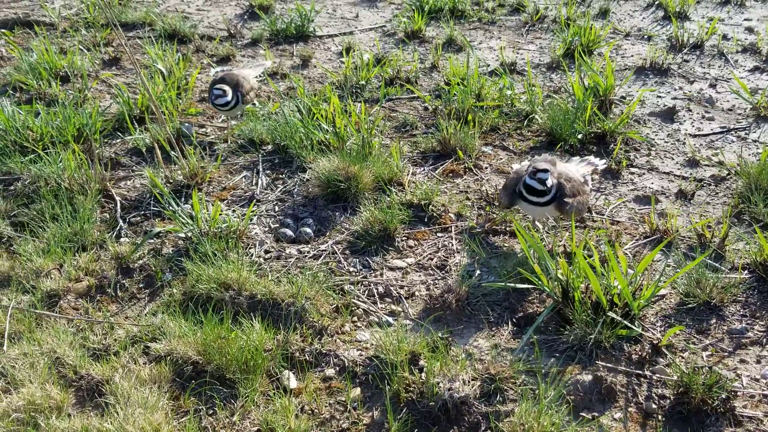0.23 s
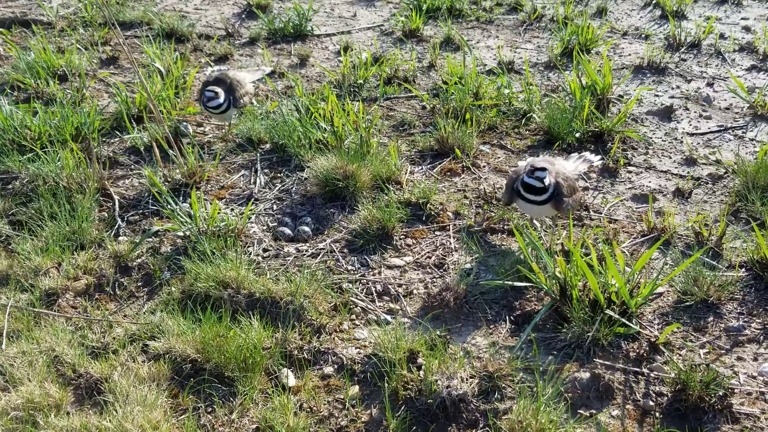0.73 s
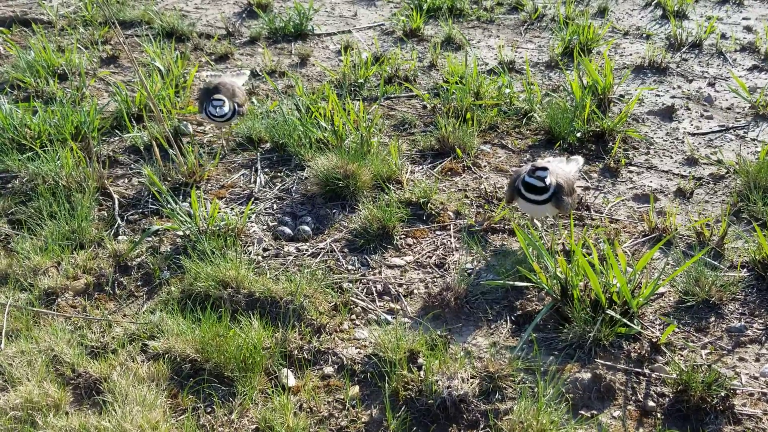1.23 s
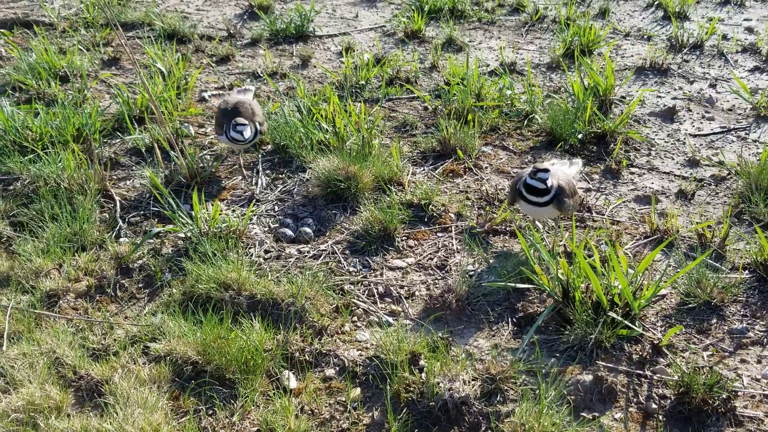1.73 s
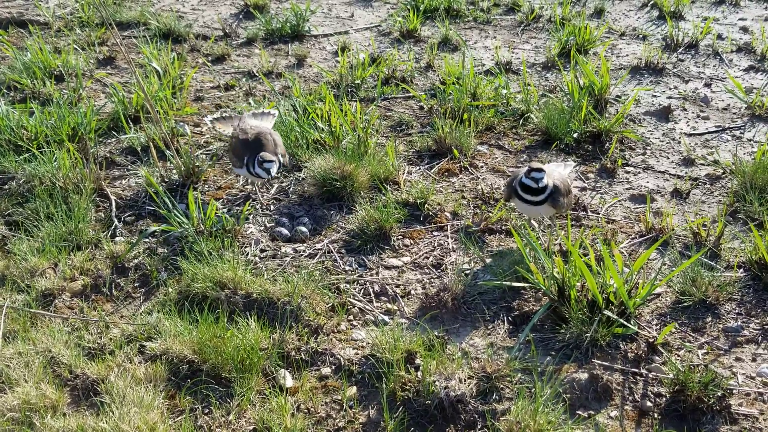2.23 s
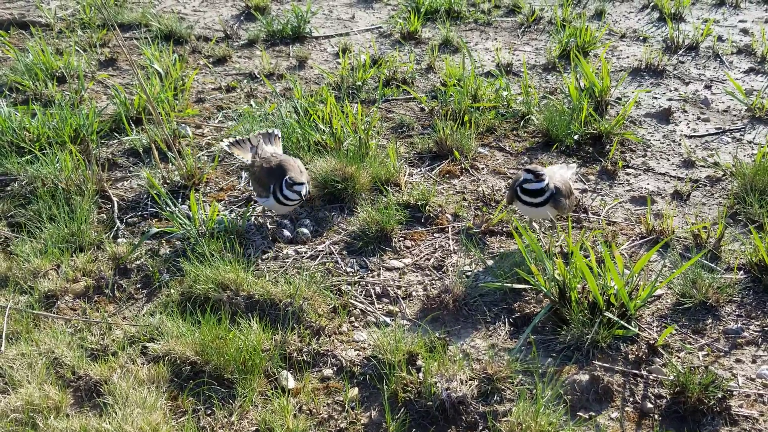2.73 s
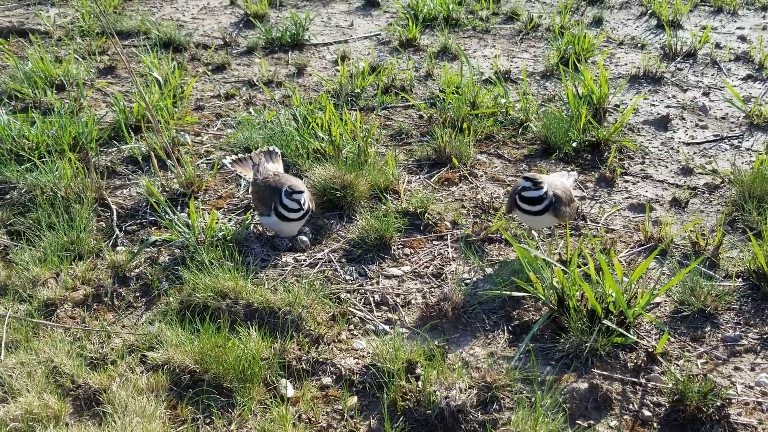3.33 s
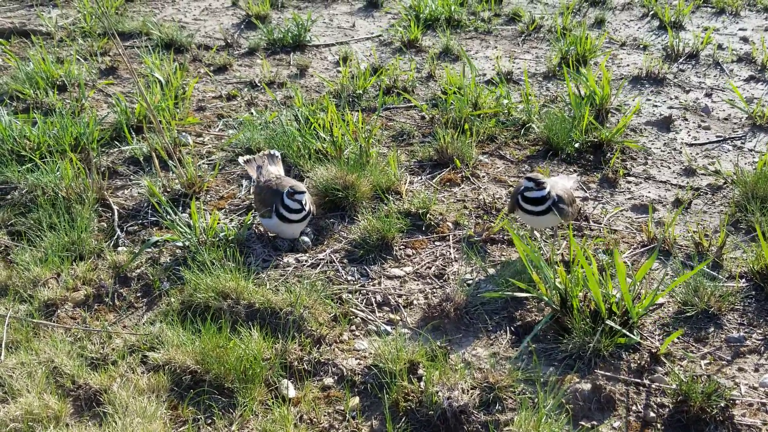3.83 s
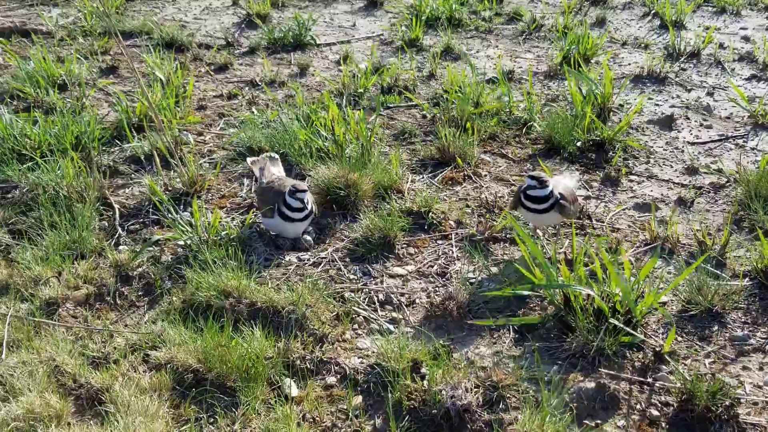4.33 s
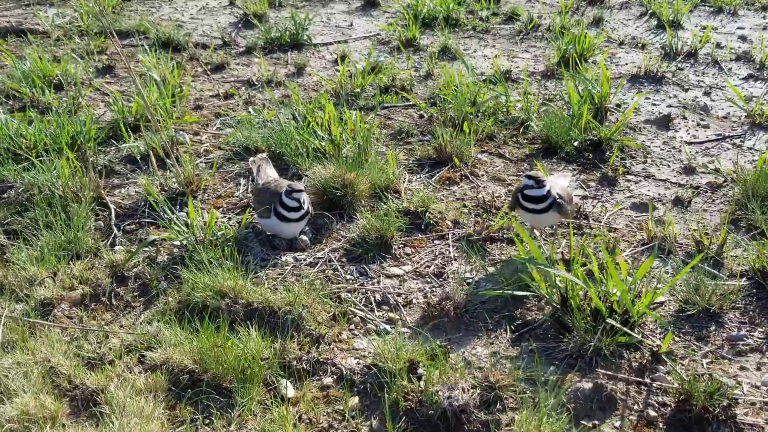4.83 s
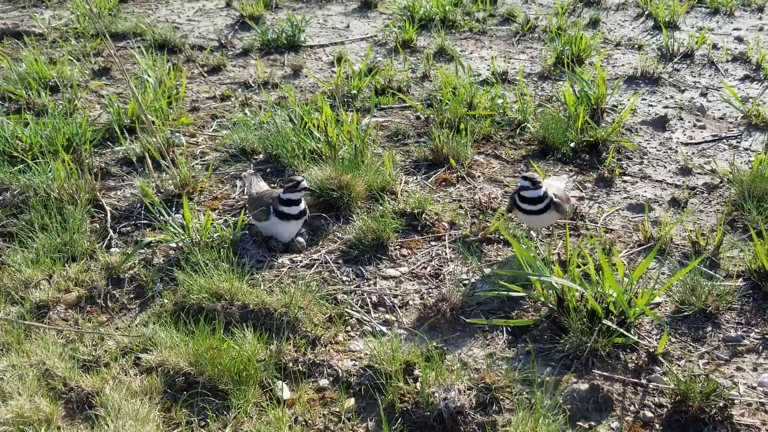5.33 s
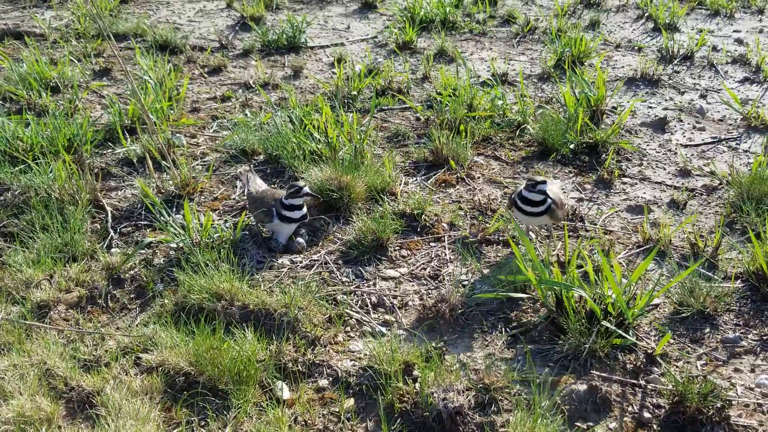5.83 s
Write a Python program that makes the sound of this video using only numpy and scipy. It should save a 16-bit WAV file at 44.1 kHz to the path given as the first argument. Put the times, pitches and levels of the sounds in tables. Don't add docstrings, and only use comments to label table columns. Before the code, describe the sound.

In an open grassy field, two killdeer-like shorebirds near a ground nest give loud, piercing alarm peeps, overlapping at first, then one bird note after note. After a brief pause comes a hissy breath and a long dipping whistle. Wind then strikes the microphone in bassy thumps and pops, with isolated calls and finally soft wavering calls and a short trill. Faint insects and rustling leaves lie beneath.

```python
import sys
import numpy as np
from scipy import signal
from scipy.fft import rfft, irfft, next_fast_len
from scipy.io import wavfile
from scipy.ndimage import uniform_filter1d, map_coordinates

SR = 44100
rng = np.random.default_rng(int(sys.argv[2]) if len(sys.argv) > 2 else 0)


def store_wav(level_fs):
    pcm = np.round(np.clip(np.atleast_2d(level_fs), -1, 1) * 32767)
    wavfile.write(sys.argv[1], SR, pcm.T.astype(np.int16))


def decibels_to_gain(level_db):
    exponent = np.asarray(level_db, float) / 20
    return 10 ** exponent


N = 267598


def unit(x):
    return x / np.sqrt(np.mean(x ** 2) + 1e-20)


def along(points, hz):
    f, v = np.transpose(points)
    return np.interp(np.log(hz + 1), np.log(f + 1), v)


def wobble(rate):
    knots = rng.standard_normal(int(N * rate / SR) + 4)
    return map_coordinates(knots, [np.arange(N) * rate / SR])


def coloured(x, spectrum):
    m = next_fast_len(N + 8192)
    gain = decibels_to_gain(along(spectrum, np.fft.rfftfreq(m, 1 / SR)))
    return irfft(rfft(x, m) * gain, m)[..., :N]


def noise(spectrum):
    return unit(coloured(rng.standard_normal(N), spectrum))


def churn(spectrum, span):
    x = noise(spectrum)
    power = uniform_filter1d(uniform_filter1d(x * x, span), span)
    return x / np.sqrt(np.abs(power) + 0.025)


def add(track, s, x):
    i = round(s * SR)
    track[i:i + len(x)] += x[:len(track) - i]


def echoes(x, t60):
    t = np.arange(SR // 2) / SR
    tail = rng.standard_normal(len(t)) * decibels_to_gain(-60 * t / t60) * (t > .004)
    return signal.fftconvolve(x, tail / np.linalg.norm(tail))[:N]


def open_field():
    # frequency in Hz, level in dB.
    murmur = [(300, -2.5), (700, -7), (1200, -6), (1950, -9.5), (2150, -16.5), (3000, -37)]
    return decibels_to_gain(-57.0 + wobble(3.5)) * noise(murmur)


def leaves():
    # time in seconds, level in dB.
    swell = [(0, -65), (2.801, -71.5), (3.101, -65), (4, -72), (4.8, -74.5), (5.299, -70), (6.07, -65)]
    # frequency in Hz, level in dB.
    brushing = [(2000, -30.5), (2300, -5.5), (3800, 3.5), (4300, -8.5), (5300, -7.5), (5700, -29),
                (8500, -25), (12000, -9.5), (15500, -25)]
    level_db = np.interp(np.arange(N) / SR, *np.transpose(swell)) + 1.2 * wobble(3.8)
    return decibels_to_gain(level_db) * noise(brushing)


def insects():
    beat = np.cos(2 * np.pi * np.cumsum(50 + 2.2 * wobble(2.9)) / SR)
    chorus = noise([(1550, -41.5), (1720, -2.0), (1900, 4.0), (2000, -12.5), (2120, -37.0)])
    return decibels_to_gain(-63.0 + wobble(0.97) + 3.3 * beat) * chorus


def far_birds():
    # start in seconds, length in seconds, start pitch in Hz, end pitch in Hz, level in dB.
    glides = [(3.239, 0.15, 2700, 2790, -82), (3.325, 0.077, 3140, 2970, -71),
              (3.45, 0.031, 2770, 3350, -70.5), (3.49, .045, 2760, 2640, -75.5),
              (3.852, 0.05, 2960, 3720, -75.5), (3.899, 0.06, 3150, 2747, -73),
              (3.929, 0.079, 2910, 2596, -78.5), (4.361, 0.069, 2720, 3150, -72.5),
              (4.401, 0.088, 2490, 2330, -79.5), (4.867, 0.12, 2660, 2734, -75),
              (5.418, 0.053, 2990, 3000, -75)]
    # start in seconds, spacing in seconds, first pitch in Hz, last pitch in Hz.
    rattle = (3.064, .0321, 3260, 3550)
    out, husk = np.zeros(N), wobble(220)
    start, spacing, first_hz, last_hz = rattle
    pips = []
    for u in np.linspace(0, 1, num=8):
        hz = first_hz + (last_hz - first_hz) * u
        pips.append((start + 7 * spacing * u ** 1.07, .005, hz + 200, hz - 200, -61 + 4 * u))
    for s, length, hz0, hz1, db in glides + pips:
        n = round(length * SR)
        huskiness = .025 * min(abs(hz1 - hz0) / 150, 1)
        f = np.linspace(hz0, hz1, n) * (1 + huskiness * husk[round(s * SR):][:n])
        add(out, s, decibels_to_gain(db + 15.5) * np.hanning(n) ** .5 * np.sin(2 * np.pi * np.cumsum(f) / SR))
    hiss = noise([(5700, -37), (6500, 2.5), (7500, -19), (9500, -13.5), (11500, -0.5), (15000, -8)])
    fade = np.hanning(SR // 2)[SR // 8:]
    add(out, start, decibels_to_gain(-69.0) * fade * hiss[:len(fade)])
    return out


def buffet(puffs, breeze):
    # frequency in Hz, level in dB.
    thump = [(30, -29.5), (70, -5.5), (130, 2), (210, -6), (320, -15), (600, -41.5), (1000, -83)]
    flutter = [(100, -23), (250, 7), (400, 3.5), (700, -12.5), (1100, -29.5), (1800, -48), (2600, -77)]
    rumbling = [(12, -9.5), (40, 0.5), (80, 7), (130, -5.5), (250, -50.5)]
    t = np.arange(N) / SR
    steady = decibels_to_gain(2 * np.interp(t, *breeze))
    low, high = steady * decibels_to_gain(1.8 * (-8.5 + 7.2 * wobble(13))), np.zeros(N)
    for s, db, ms, bright_db in puffs:
        i = slice(max(round((s - ms / 400) * SR), 0), round((s + ms / 400) * SR))
        late = (t[i] - s) * 1000 / ms
        shape = np.exp(-5.5 * (late * np.where(late < 0, 1.25, .85)) ** 2)
        low[i] += decibels_to_gain(2 * (db - 2.0)) * shape
        high[i] += decibels_to_gain(2 * (db + bright_db)) * shape ** 3.01
    slow_power = steady + decibels_to_gain(-18.0) * np.abs(uniform_filter1d(low, size=5000))
    rumble = np.sqrt(slow_power) * noise(rumbling)
    thumps = np.sqrt(low) * churn(thump, span=900)
    spikes = decibels_to_gain(5.16 * wobble(150) - 2.5)
    return rumble + thumps + np.sqrt(high) * spikes * churn(flutter, span=250)


def pops():
    # time in seconds, level in dB.
    snaps = [(3.613, -11), (3.6386, -13), (3.667, -12), (3.676, -18.5), (3.684, -20.5), (3.9, -22.5),
             (3.977, -30), (4.099, -14), (4.229, -16.5), (4.318, -33), (4.343, -37.5), (4.421, -32.5),
             (4.475, -26.5), (4.771, -10), (5.183, -25.5), (5.57, -13), (5.955, -24.5), (5.971, -17)]
    # frequency in Hz, level in dB.
    snap_colour = [(40, -19.5), (150, 1), (800, 1.5), (1500, -17), (2300, -37), (4000, -64)]
    suck_ms, rebound_ms, rebound = 1.8, 3.5, .5
    kicks, ms = np.zeros(N), np.arange(-800, 801) * 1000 / SR
    for s, db in snaps:
        kicks[round(s * SR)] = decibels_to_gain(db + 10.5)
    inward = -np.exp(-np.abs(ms) / suck_ms)
    overshoot = rebound * np.exp(-np.abs(ms) / rebound_ms)
    shape = np.where(ms < 0, inward, overshoot)
    return coloured(signal.fftconvolve(kicks, shape, "same"), snap_colour)


def membrane(x):
    return .96 * coloured(x / (1 + np.abs(x) ** 4) ** (1 / 4), [(1900, 0), (3400, -35)])


def wind():
    # time in seconds, peak level in dB, width in ms, brightness in dB.
    left_puffs = [(0.889, -24, 27.4, -25), (1.806, -21, 16.3, -12), (0.008, -32, 28, -10),
                  (2.89, -14.5, 29.4, -0.5), (3.135, -22, 39, -8), (3.269, -10.5, 19, -13),
                  (3.337, -15, 17, -10), (3.606, -13.5, 91, -7.5), (3.661, -10.5, 55, 2.5),
                  (3.707, -11.5, 12.7, -5), (3.586, -15, 14, -11), (3.755, -16.5, 48, -19),
                  (3.805, -15, 16.4, -17), (3.833, -17.5, 20.4, -7), (3.872, -13.5, 19, -2),
                  (3.95, -20, 123, -4), (4.105, -14, 55, 0.5), (4.233, -15.5, 41, -0.5),
                  (4.318, -14.5, 17.5, -11), (4.342, -14.5, 9.3, -15.5), (4.395, -20, 36, 1),
                  (4.421, -12, 16.3, -7), (4.48, -19.5, 40, -17), (4.712, -14, 16, -42.5),
                  (4.775, -13.5, 8.6, -7.5), (4.822, -21.5, 26, -6.5), (4.859, -17, 16, -36.5),
                  (4.982, -27, 13.4, -29), (5.07, -29, 14, -30), (5.038, -17.5, 15.8, -15),
                  (5.137, -19, 12, -4), (5.182, -15.5, 21, -6.5), (5.2, -16.5, 19, -3),
                  (5.232, -19.5, 25, -27), (5.276, -13, 20.6, -11.5), (5.512, -21, 13, -27),
                  (5.555, -13.5, 53, -3), (5.598, -12.5, 12.6, -1.5), (5.622, -22.5, 25, 1.5),
                  (5.652, -12.5, 27.4, -7.5), (5.722, -18.5, 57.5, -2.5), (5.775, -31, 12, -21.5),
                  (5.92, -17.5, 75, -3.5), (5.978, -16, 56.4, 2.5), (6.03, -27.5, 41, -25)]
    right_puffs = [(3.392, -11, 13.3, -19), (3.419, -12, 11, -6), (3.438, -16, 27, -9.5),
                   (3.474, -13, 10, -9), (3.516, -21, 13.4, 3), (3.555, -10, 28, -8), (2.66, -52, 33, -15),
                   (3.495, -6, 20, -16.5), (3.585, -20, 60, -16.5), (3.674, -39.5, 30, -5),
                   (3.997, -24, 22, -24.5), (4.154, -23, 34, -37), (4.999, -21, 35, -40),
                   (5.486, -20, 13, -44), (5.55, -37.5, 69, -23), (5.829, -17.5, 24.6, -43),
                   (5.986, -35, 61, -18)]
    further_left_puffs = [(0.393, -30, 14, -37), (.432, -36, 14, -27), (.56, -36.5, 17, -32),
                          (0.649, -35, 33, -23), (1.227, -32.5, 21, -18), (1.409, -31, 10, -13),
                          (1.532, -35, 27, -38.5), (1.601, -34.5, 24, -31.5), (1.712, -31, 22, -25),
                          (1.919, -31.5, 31, -29), (2.073, -28, 19, -29), (2.267, -31.5, 18, -30),
                          (4.165, -18.5, 42, -5.5), (3.046, -32, 16, -20)]
    # time in seconds, left port level in dB, right port level in dB.
    steady_breeze = [(0, -46, -45), (1, -44.5, -47.5), (1.5, -36.5, -44), (2.5, -42.5, -44.5),
                     (3.25, -39, -48), (3.55, -39, -26), (3.8, -30.5, -36.5), (4.3, -30, -45.5),
                     (4.55, -44, -46), (4.8, -30.5, -40.5), (5.05, -41, -53.5), (5.55, -34.5, -31.5),
                     (6.07, -58, -51)]
    s, left_db, right_db = np.transpose(steady_breeze)
    left = membrane(buffet(left_puffs + further_left_puffs, (s, left_db)) + pops())
    right = membrane(buffet(right_puffs, (s, right_db)))
    return left, right


def bird(notes, tone, middle_hz, facing, crack_db, margin_db, size=90, turning=False):
    # frequency in Hz, level in dB.
    throat = [(6600, -2.5), (7400, -12.5), (8200, -2.5), (11800, -4), (12800, 2), (13800, -3.5)]
    out, quiver, flicker = np.zeros(N), wobble(240), [wobble(45) for _ in range(len(tone) + 1)]
    rasp = wobble(1100)
    air = noise([(3500, -13), (5100, 7.5), (6500, -21.5), (9500, -11), (15000, -9)])
    for rows in notes:
        s, hz, db = np.transpose(rows)
        i = slice(max(round(s[0] * SR), 0), round(s[-1] * SR))
        t = np.arange(N)[i] / SR
        face = np.interp(t if turning else s[0], *np.transpose(facing))
        glide = uniform_filter1d(uniform_filter1d(np.interp(t, s, hz), size=size), size=size)
        f = glide * (1 + 0.0019 * quiver[i])
        gain = uniform_filter1d(np.interp(t, s, decibels_to_gain(db / 2)), size=40) ** 2
        weak_db = .9 * np.minimum(20 * np.log10(gain) - db.max() + margin_db, 0) * (t > s[1])
        opening = np.exp(-(t - s[0]) / .004) * (1 if hz[0] > .9 * middle_hz else .45)
        note = decibels_to_gain(.3 * flicker[0][i] + .35 * quiver[i]) * np.sin(2 * np.pi * np.cumsum(f) / SR)
        phase = np.pi * np.cumsum(f * (1 - crack_db / 110 * opening ** 2)) / SR
        strain = np.abs(np.gradient(uniform_filter1d(f, size=300))) * SR / 55000.0
        for (k, rel, slope), shake in zip(tone, flicker[1:]):
            lift = np.clip(slope * 100 * (f / middle_hz - 1), -30, 9) + weak_db
            lift += crack_db * opening * (round(k) == 3)
            lift += along(throat, k * f / 2)
            lift += (face - .4 * crack_db * opening) * (k > 3)
            lift += np.where(k > 2, 3.5, .8) * shake[i]
            roughness = (k > 2) * np.clip(.009 * k + 0.11 * strain, 0, 1)
            note += decibels_to_gain(rel + lift) * (1 + roughness * rasp[i]) * np.sin(round(k) * phase)
        note += decibels_to_gain(-56.5 + 2.6 * crack_db * opening ** .5) * air[i]
        edge = np.clip(np.minimum(t - s[0] - .001, s[-1] - t) / .002, 0, 1)
        out[i] += 2 ** .5 * gain * edge * note
    return out


def louder(calls):
    return [np.add(rows, [0, 0, 7]) for rows in calls]


def bounced(x):
    # delay in ms, level in dB.
    bounces = [(2.9, -27.5), (8.5, -30.5)]
    i = np.arange(N)
    return x + sum(decibels_to_gain(db) * np.interp(i - ms * SR / 1000, i, x) for ms, db in bounces)


def trilled(rows):
    top, edge_db = 0.6, -6.5
    rise, fall = 8, 8
    u = np.linspace(0, 1, num=11)
    away = np.where(u < top, (u / top - 1) ** 2, ((u - top) / (1 - top)) ** 2)
    bend = np.where(u < top, rise, fall) / 100
    return [np.transpose([s + length * u, hz * (1 - bend * away), db + edge_db * away ** 0.75])
            for s, length, hz, db in rows]


def soft_calls():
    # time in seconds, pitch in Hz, level in dB.
    murmurs = [
        [(5.053, 4000, -69.5), (5.092, 4620, -57), (5.106, 4520, -55), (5.116, 4730, -48.5), (5.14, 4580, -52),
         (5.186, 4940, -41), (5.198, 4880, -42), (5.212, 4370, -52.5), (5.217, 4340, -52)],
        [(5.699, 4110, -61), (5.705, 4165, -49.5), (5.715, 4388, -44.5), (5.743, 4530, -51),
         (5.767, 4620, -48.5), (5.783, 4370, -62), (5.789, 4333, -60.5)],
        [(5.868, 3950, -60), (5.878, 4090, -54.5), (5.894, 4130, -49), (5.906, 4380, -53), (5.916, 4220, -62),
         (5.922, 4400, -71)],
    ]
    # start in seconds, length in seconds, top pitch in Hz, level in dB.
    pips = [
        (5.251, 0.024, 4836, -32),
        (5.33, 0.036, 4776, -38.5),
        (5.411, 0.038, 4698, -39),
        (5.496, 0.038, 4686, -36),
        (5.591, 0.042, 4690, -37.5),
    ]
    # multiple of the fundamental, level in dB, dB gained per 1% higher pitch.
    soft_tone = [(1, -18, -0.22), (3, -25, 1.15), (4, -19.5, -0.093), (5, -25.5, 0.34), (6, -33, 0.74),
                 (7, -28, 1.2)]
    return bird(louder(murmurs) + trilled(pips), soft_tone, 4430, [(0, 0.003)],
                crack_db=-1, margin_db=10, size=140)


def single_calls():
    # time in seconds, pitch in Hz, level in dB.
    calls = [
        [(3.392, 3450, -46), (3.398, 3260, -33), (3.414, 3280, -31.5), (3.432, 3213, -35), (3.443, 3204, -57)],
        [(4.245, 3300, -42), (4.253, 3610, -34.5), (4.265, 3770, -33), (4.307, 3556, -33), (4.359, 3617, -34.5),
         (4.379, 3770, -45), (4.388, 3720, -76)],
    ]
    # multiple of the fundamental, level in dB, dB gained per 1% higher pitch.
    single_tone = [(1, -29.5, -0.67), (3, -30.5, -0.56), (4, -28.5, 1.3), (5, -24, 1.7), (6, -43, 0.42)]
    return bird(louder(calls), single_tone, 3537, [(0, 0.011)], crack_db=11.5, margin_db=7.5)


def breath():
    t = np.arange(N) / SR
    level_db = np.interp(t, [2.845, 2.857, 2.886, 2.892], [-74.5, -49.5, -44.0, -84.0])
    return decibels_to_gain(level_db) * noise([(2200, -25.0), (3000, 0), (4200, 1.0), (5400, -17.5), (6500, -34.5)])


def joined(pitch, level):
    s = np.union1d(*[np.transpose(c)[0] for c in (pitch, level)])
    return [np.transpose([s, np.interp(s, *np.transpose(pitch)), np.interp(s, *np.transpose(level))])]


def long_call():
    # time in seconds, pitch in Hz.
    dip = [(2.886, 3701.5), (2.897, 3932), (2.909, 4001), (2.94, 3560), (2.956, 3478), (3.02, 3678),
           (3.045, 3698.5), (3.082, 4290), (3.093, 4198)]
    # time in seconds, level in dB.
    loudness = [(2.886, -36.5), (2.891, -20.5), (2.918, -16.5), (2.957, -27), (2.976, -25), (3.01, -19),
                (3.066, -20.5), (3.073, -32), (3.08, -31), (3.093, -48)]
    # multiple of the fundamental, level in dB, dB gained per 1% higher pitch.
    long_tone = [(1, -24, 1.8), (3, -28.5, 0.16), (4, -36.5, 1), (5, -39.5, .5), (6, -39, 1),
                 (7, -32.5, 0.87), (8, -45, 0.019)]
    bill = [(2.9, -2.5), (2.94, 3.5), (3.055, -4.5), (3.08, 12)]  # seconds, dB on the upper overtones
    return bird(louder(joined(dip, loudness)), long_tone, 4010, bill,
                crack_db=4, margin_db=25.5, size=330, turning=True)


def alarm_notes():
    # time in seconds, pitch in Hz, level in dB.
    opening_notes = [
        [(-.02, 4330, -14), (0, 4320, -12.5), (.03, 4224, -12), (.042, 4124, -12), (.05, 3850, -42)],
        [(.026, 3450, -40), (.029, 3560, -21), (.036, 3720, -12.5), (.047, 3985, -13.5), (.072, 3950, -13),
         (.088, 3925, -19), (.1, 3900, -45)],
        [(.107, 3990, -48.5), (.111, 4160, -12.5), (.116, 4400, -10.5), (.125, 4418, -10.5), (.15, 4312, -13.5),
         (.185, 4220, -12), (.193, 4080, -14), (.199, 3820, -35)],
        [(.176, 3560, -44.5), (.18, 3570, -17), (.188, 3686, -14), (.197, 3970, -12.5), (.21, 4017, -15),
         (.255, 3990, -16), (.262, 4050, -16), (.266, 3950, -36)],
        [(.264, 3873, -30), (.269, 4072, -22), (.274, 4117, -12), (.28, 4134, -10.5), (.288, 4072, -13.5),
         (.296, 3948, -21.5), (.309, 3741, -19.5), (.32, 3678, -49)],
    ]
    early_notes = [
        [(0.371, 3730, -71.5), (0.374, 3840, -19.5), (0.381, 4230, -12), (0.387, 4310, -10.5),
         (0.427, 4202, -11.5), (0.434, 4124, -13), (0.442, 3910, -27), (0.45, 3780, -54)],
        [(0.505, 4230, -59), (0.509, 4140, -13), (0.514, 4380, -11), (0.522, 4474, -12.0), (0.611, 4386, -13.0),
         (0.623, 4200, -13), (0.63, 4030, -27), (0.64, 3970, -49.5)],
        [(0.7, 3700, -54), (0.703, 3910, -19), (0.712, 4240, -12.5), (0.719, 4240, -12), (0.744, 4075, -16),
         (0.75, 3920, -27.0), (0.754, 3884, -20.5), (0.765, 3730, -57)],
        [(0.816, 3770, -61), (0.819, 3800, -21), (0.826, 4170, -13.5), (0.833, 4177, -14.5), (0.888, 4040, -17),
         (0.895, 4000, -27.5), (0.903, 3844, -22), (0.91, 3804, -53)],
        [(0.966, 3650, -63.5), (0.973, 3836, -15), (0.979, 4026, -23.0), (0.995, 4040, -14),
         (1.007, 3940, -23.5), (1.026, 3876, -16), (1.035, 3736, -18.5), (1.05, 3590, -66)],
        [(1.105, 3810, -57.5), (1.111, 3844, -13.5), (1.116, 4020, -20), (1.126, 4100, -12), (1.138, 4036, -16),
         (1.182, 4084, -14.5), (1.198, 3810, -27.5), (1.205, 3920, -51.0)],
        [(1.26, 3900, -57.5), (1.264, 4000, -18.5), (1.269, 4160, -12), (1.275, 4299, -9.5), (1.311, 4254, -11),
         (1.351, 4150, -11.5), (1.356, 4150, -13), (1.36, 3900, -17.5)],
    ]
    late_notes = [
        [(1.359, 3930, -15.5), (1.361, 3900, -24.5), (1.365, 3460, -20), (1.375, 3680, -14.5),
         (1.385, 3826, -15.0), (1.42, 3623, -15), (1.435, 3570, -25.5), (1.436, 3874, -30)],
        [(1.435, 3720, -29), (1.442, 4250, -9.5), (1.452, 4378, -10), (1.507, 4396, -10.0), (1.537, 4300, -9.5),
         (1.548, 4130, -13), (1.554, 3890, -23), (1.565, 3990, -60.5)],
        [(1.625, 3820, -56), (1.628, 3810, -19), (1.636, 4245, -10.0), (1.647, 4296, -9.0),
         (1.673, 4219, -11.5), (1.705, 3940, -17), (1.708, 3880, -13.5), (1.725, 3630, -64)],
        [(1.779, 3590, -52.5), (1.783, 3730, -16.5), (1.791, 3860, -11.5), (1.803, 3960, -14.5),
         (1.817, 3830, -10.5), (1.831, 3490, -29.5), (1.834, 3540, -19.5), (1.845, 3400, -61.5)],
        [(1.904, 3670, -53.5), (1.909, 3745, -13.5), (1.918, 3870, -9.5), (1.936, 3942, -12.5),
         (1.967, 3910, -11.5), (1.98, 3800, -11), (1.988, 3640, -36), (1.995, 3700, -60.0)],
        [(2.048, 3640, -54.5), (2.055, 3884, -11.5), (2.061, 4071, -14), (2.121, 4120, -15.5),
         (2.151, 4044, -17), (2.164, 3840, -21), (2.168, 3800, -32), (2.178, 3930, -47.5)],
        [(2.231, 3970, -66), (2.235, 3860, -14.5), (2.243, 4180, -17), (2.249, 4140, -12), (2.28, 4034, -15.5),
         (2.294, 4027, -13), (2.305, 3787, -22.5), (2.315, 3760, -44)],
        [(2.368, 3960, -59), (2.372, 3830, -15), (2.38, 4070, -12), (2.391, 4076, -12.5), (2.408, 3967, -10.5),
         (2.421, 3840, -16), (2.431, 3780, -16), (2.447, 3510, -62.5)],
    ]
    # multiple of the fundamental, level in dB, dB gained per 1% higher pitch.
    alarm_tone = [(1, -33.5, 1.3), (3, -30.5, -0.5), (4, -25.5, 0.74), (5, -32.5, 0.22), (6, -37.5, 0.6),
                  (7, -24, 2), (8, -30.5, 0.5)]
    # time in seconds, dB on the upper overtones.
    bill = [(0, -1.5), (.107, -0.5), (.18, -1.5), (.27, -0.5), (.37, -2), (.5, -0.5), (.7, -1), (0.819, 1),
            (.97, 5.5), (1.1, 3), (1.26, -1), (1.44, 0.5), (1.63, 3), (1.78, 7), (1.9, 4), (2.05, 8),
            (2.23, 7), (2.37, 5.5)]
    return bird(opening_notes + early_notes + late_notes, alarm_tone, 3985, bill,
                crack_db=18.5, margin_db=13.0)


def scene():
    # frequency in Hz, dB against the left.
    right_port = [(500, -19), (2000, -24), (3600, -25), (4400, -27), (8000, -25.5), (15000, -26)]
    near = alarm_notes() + breath() + long_call() + single_calls()
    soft, far = soft_calls(), far_birds()
    air = open_field() + leaves() + insects()
    air += far + soft + echoes(decibels_to_gain(-3) * far + decibels_to_gain(-27) * soft, t60=.3)
    air += bounced(near) + decibels_to_gain(-43.5) * echoes(near, t60=0.063) + decibels_to_gain(-52) * echoes(near, t60=0.77)
    left, right = wind()
    left_mix = air + left + decibels_to_gain(-22.0) * right
    right_mix = coloured(air, right_port) + right + decibels_to_gain(-26.0) * left
    return np.array([left_mix, right_mix])


def low_pass(x):
    return signal.sosfilt(signal.butter(12, 16540, fs=SR, output="sos"), x)


def record(dry):
    hiss = decibels_to_gain([[-72], [-88]]) * rng.standard_normal(dry.shape)
    banded = coloured(dry + hiss, [(15600, 0), (15900, -60)])
    return low_pass(np.clip(banded, -1, 1))


dry = scene()
out = record(dry)
store_wav(out)
```